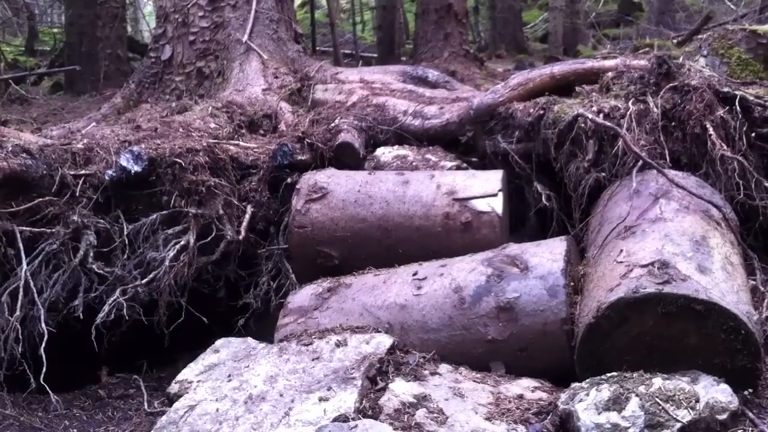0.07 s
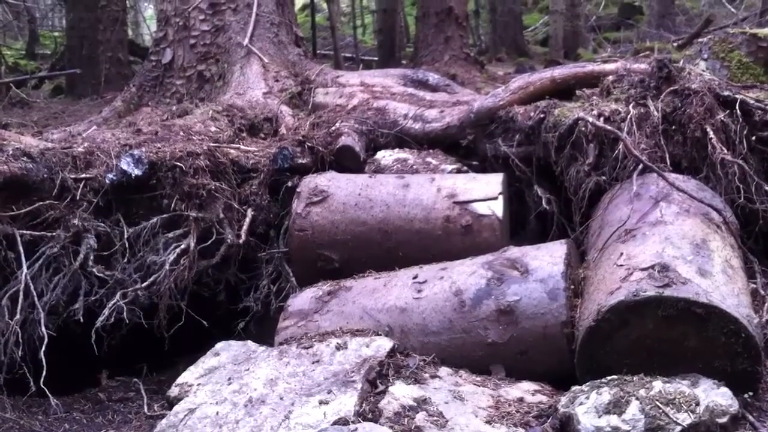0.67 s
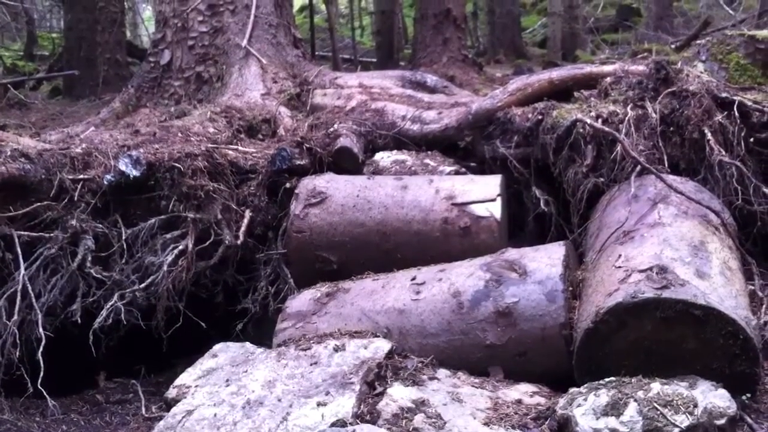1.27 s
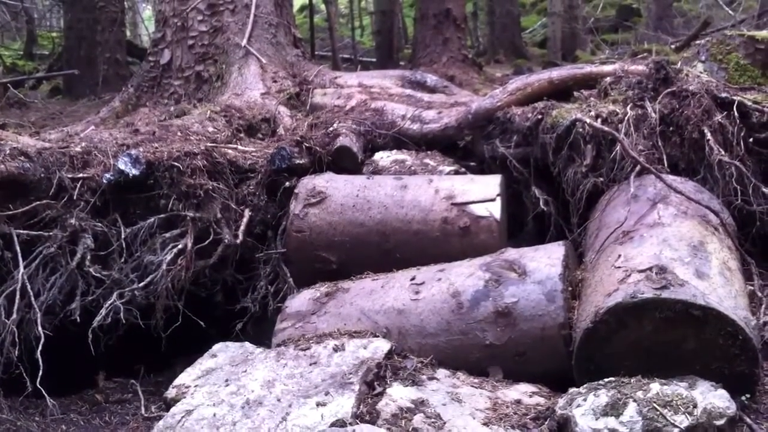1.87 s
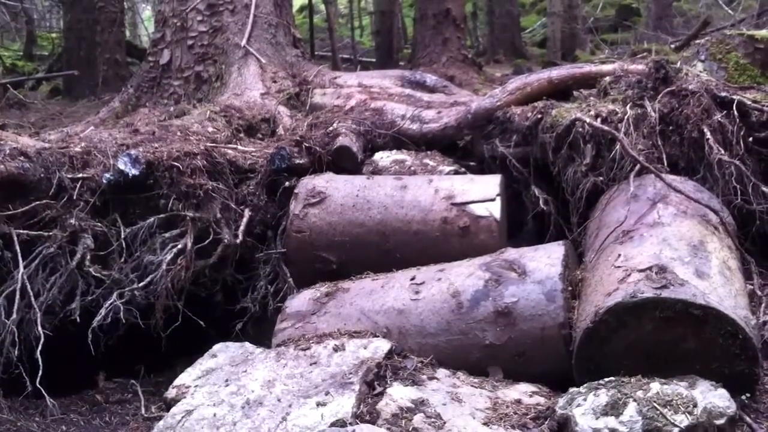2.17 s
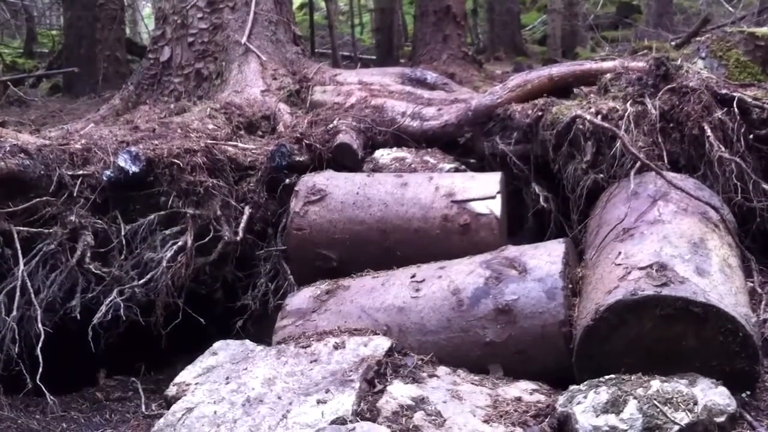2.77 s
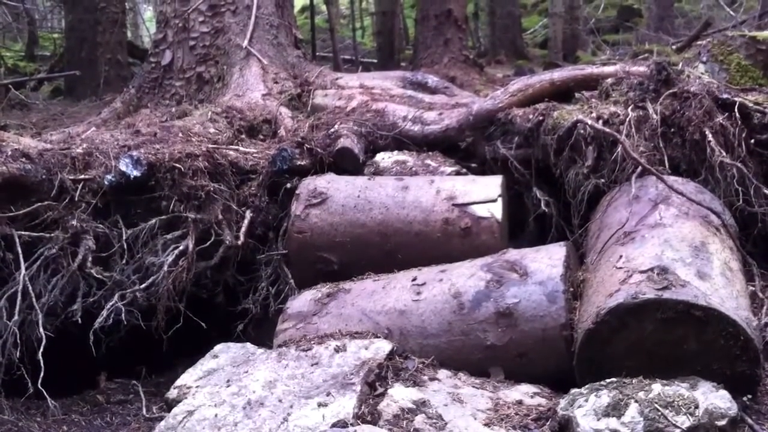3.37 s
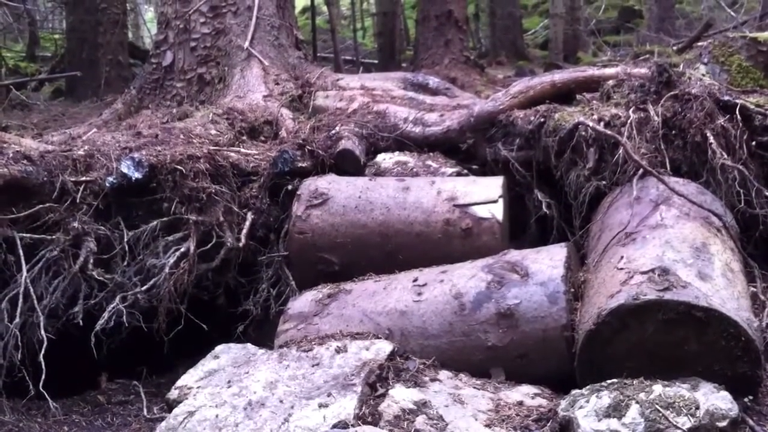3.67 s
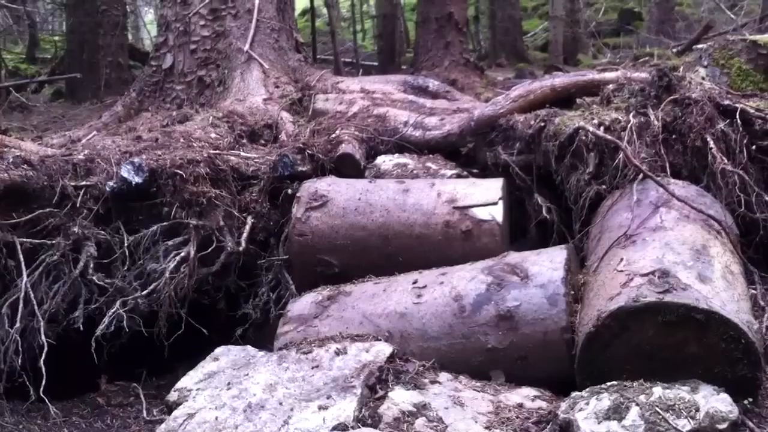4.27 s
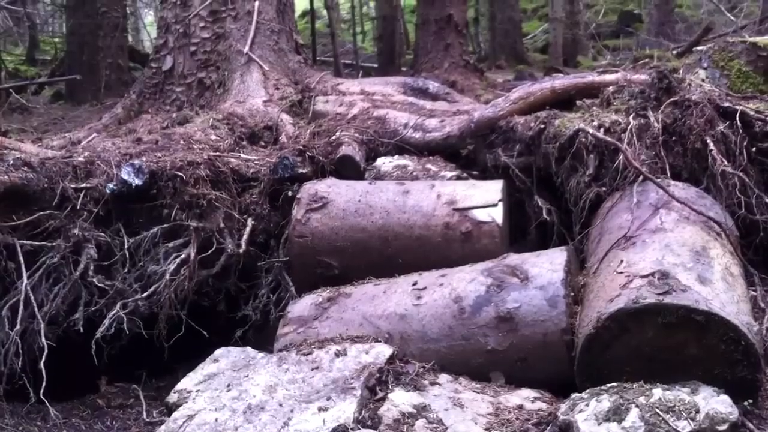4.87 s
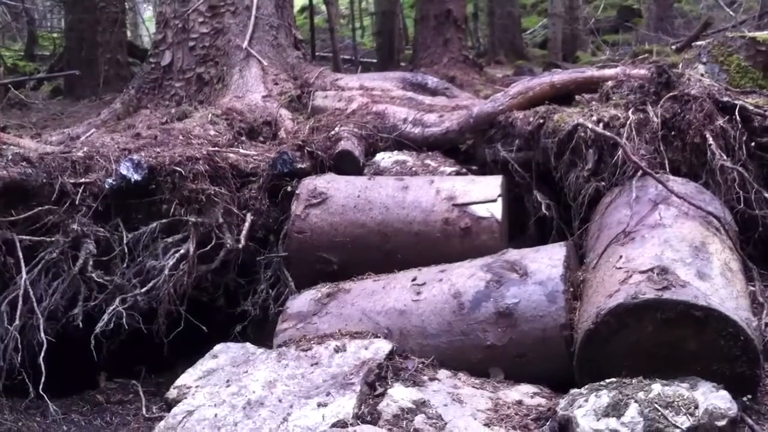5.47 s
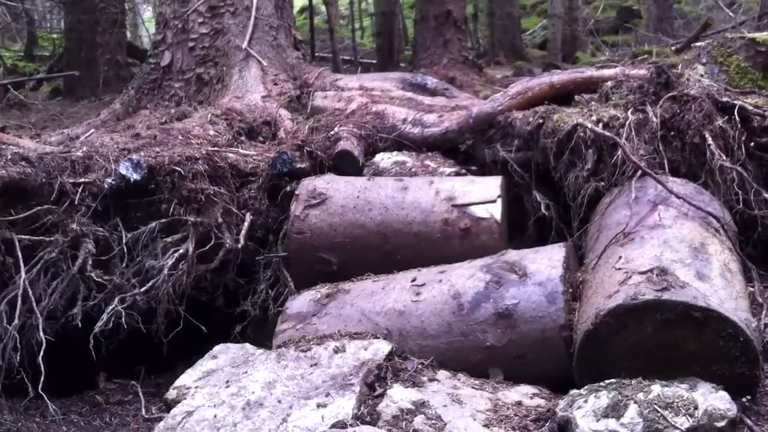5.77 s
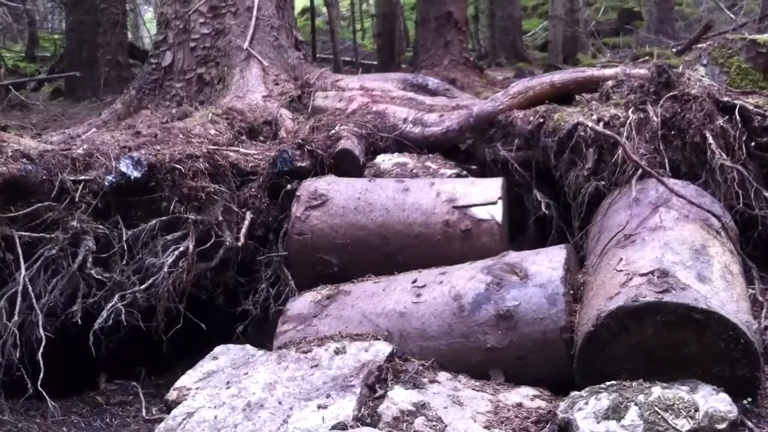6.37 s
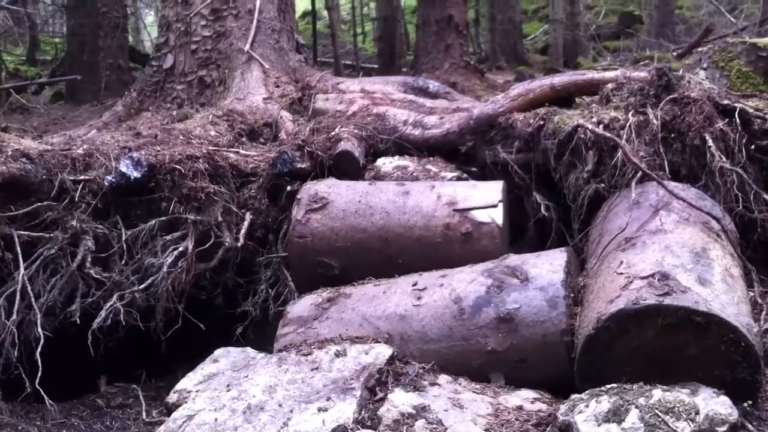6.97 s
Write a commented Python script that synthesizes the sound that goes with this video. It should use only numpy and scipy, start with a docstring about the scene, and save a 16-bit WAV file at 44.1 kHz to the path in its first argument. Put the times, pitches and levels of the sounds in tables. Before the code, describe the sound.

Soft, steady wind blows through the crowns of a conifer forest, a broad rush with a hiss of needles that slowly grows a little. A tiny songbird gives thin, very high, falling calls, mostly in pairs, with a quick run of slurred notes early on and faint chips between. About halfway, something small and dry snaps once close to the microphone. The trunks lend the calls a slight echo.

```python
"""In a conifer forest, wind slowly rises in the crowns. Boughs, twigs and needles shed eddies, the thinner
the higher in pitch: a deep roar, a broad sough, a hiss. A tiny songbird whistles thin, high, falling
calls, mostly in pairs, a run of slurs and faint flicks, which the trunks scatter. One faint note comes
from farther off, and once something small and dry snaps close by as its fibres break.
A faint steady hiss lies under it all, and both channels carry the same sound."""
import sys
import numpy as np
from scipy import signal
from scipy.fft import rfft, irfft, next_fast_len
from scipy.io import wavfile
from scipy.ndimage import uniform_filter1d, map_coordinates

SR = 44100
rng = np.random.default_rng(int(sys.argv[2]) if len(sys.argv) > 2 else 0)


def file_out(sig):
    """Save sig as 16-bit WAV at sys.argv[1]."""
    # one column per channel
    cols = np.atleast_2d(sig).T
    # limit, then scale
    lim = np.clip(cols, -1, 1)
    pcm = np.round(lim * 32767).astype(np.int16)
    wavfile.write(sys.argv[1], SR, pcm)


N = 313992

# Spectra of the five parts of the wind: frequency_hz, relative_density_db
ROAR_SPECTRUM = [(20, -22), (50, -29), (75, -20.5), (100, -14), (130, -6), (170, -2), (270, 0.3), (380, -2),
                 (550, -4), (1000, -46)]
SOUGH_SPECTRUM = [(250, -41), (400, -12.5), (520, -5.5), (650, 0), (850, 0.05), (1050, 1.4), (1400, 0.05),
                  (1650, -3.5), (1900, -9), (2600, -12.5), (4000, -24), (7000, -27.5), (11000, -34)]
NEEDLE_SPECTRUM = [(900, -25), (1600, -4.5), (2000, 0), (2750, -0.7), (3200, -5), (3900, -5.5),
                   (4700, -9.5), (5600, -15), (7000, -23.5), (8600, -25.5), (9800, -28), (11000, -35)]
TREETOP_SPECTRUM = [(800, -50), (1900, -14), (2450, -0.5), (2800, 0), (3300, -4.5), (4600, -10.5),
                    (6500, -25)]
RUSTLE_SPECTRUM = [(1000, -50), (2500, -15), (4200, -3), (6000, 1), (8000, -1.5), (10000, -4.5),
                   (11000, -10.5)]
# One slow gust lifting each part from its lull: lull_db, gain_db, middle_s, rise_s
ROAR_GUST = (-61, 3, 4, 7)
SOUGH_GUST = (-49.5, 3, 5, 4.5)
NEEDLE_GUST = (-57.5, 6, 4, 5.5)
TREETOP_GUST = (-70, 12, 2.5, 0.9)
RUSTLE_GUST = (-75.5, 8.5, 4, 1.8)
# Spectrum of the microphone's self-noise: frequency_hz, relative_density_db
HISS_SPECTRUM = [(300, -9), (3000, 0), (8000, 1.5), (11000, -6)]

# The songbird's three kinds of note; it turns, so the scattered share varies from note to note:
# start_s, length_s, pitch_hz, level_db, scatter_over_direct_db
CALL_NOTES = [ (0.017, 0.047, 8700, -56.5, -1), (0.566, 0.054, 8510, -53, 2), (0.748, 0.061, 8520, -54, 2),
              (2.768, 0.064, 8560, -55, 2), (2.937, 0.054, 8600, -55.5, 7), (4.396, 0.071, 8550, -53.5, -6),
              (4.562, 0.063, 8530, -55.7, -1), (6.122, 0.064, 8500, -58, 1), (6.284, .068, 8500, -57, 1)]
SLUR_NOTES = [(1.002, 0.077, 8330, -60, 3), (1.132, .08, 8400, -60, 5), (1.284, 0.075, 8460, -63, 4),
              (1.428, 0.087, 8450, -61.5, 4), (1.657, .07, 8450, -66, 3)]
FLICK_NOTES = [(0.19, .022, 8100, -61, 2), (0.925, .045, 8200, -68, 2), (1.865, .02, 8250, -68.5, 0),
               (2.44, .025, 8850, -68, 2), (3.468, .032, 8200, -65, 0), (5.068, .022, 8200, -60, 3),
               (5.17, .02, 9000, -65, 0), (5.425, .025, 9000, -64, 0), (6.496, .021, 9100, -62, -4),
               (6.775, .021, 8900, -61, -3), (7.068, 0.023, 8560, -57.5, -2)]
# The course of each kind of note: length_fraction, pitch_ratio, relative_level_db
CALL_CONTOUR = [(0, 0.95, -14), (.14, 1.055, -10), (.28, 1.005, -0.5), (.42, .995, -3.5), (.56, 1.025, -14),
                (.72, .975, -0.5), (.88, .958, -3), (1, 0.9, -13)]  # falls in two steps
SLUR_CONTOUR = [(0, 1.06, -8), (.14, 1.06, -3.5), (.34, .975, 3), (.48, .96, -1), (.72, 1.0, -10),
                (1, 1, -11)]  # dips and rebounds
FLICK_CONTOUR = [(0, 1.09, -2), (.4, 1.01, -0.5), (1, .88, -5)]  # one steep fall

# Fibres breaking in one dry snap: start_s, relative_level_db
FIBRE_BREAKS = [(4.0436, -35), (4.0454, -41), (4.047, -33), (4.049, -43)]
# Timbre of the snap: frequency_hz, gain_db
SNAP_RESPONSE = [(300, -9), (1000, 8), (2800, 1), (3800, -6), (4900, -6), (6200, -1), (7400, -4), (8200, 2),
                 (9000, -1), (9900, 0.5), (10600, -15), (11200, -26)]


def amp(db):
    """Amplitude grows tenfold for every 20 dB."""
    return 10 ** (np.asarray(db) / 20)


def unit(x):
    """Normalisation brings a signal to rms 1."""
    return x / np.sqrt(np.mean(x ** 2) + 1e-20)


def wobble(rate_hz):
    """Spline interpolation joins random knots, rate_hz a second, into a smooth curve."""
    knots = rng.standard_normal(int(N * rate_hz / SR) + 4)
    return map_coordinates(knots, [np.arange(N) * rate_hz / SR])


def filtered(x, response):
    """A linear filter multiplies the spectrum by its frequency response."""
    size = next_fast_len(N + SR // 2)
    return irfft(rfft(x, size) * response(np.fft.rfftfreq(size, 1 / SR)), size)[:N]


def coloured(x, points):
    """Spectral shaping: gain follows the points in log frequency, then falls 60 dB an octave."""
    points_hz, points_db = np.transpose(points)

    def response(hz):
        octaves_above = np.log2(np.maximum(hz / points_hz[-1], 1))
        return amp(np.interp(np.log(hz + 1), np.log(points_hz), points_db) - 60 * octaves_above)
    return filtered(x, response)


def add(track, start_s, sound):
    """Superposition: a sound adds to the track from start_s on."""
    part = track[max(round(start_s * SR), 0):][:len(sound)]
    part += sound[:len(part)]


def gust_db(lull_db, gain_db, middle_s, rise_s):
    """Slow amplitude modulation: a gust lifts the level along half a sine cycle."""
    progress = np.clip((np.arange(N) / SR - middle_s) / rise_s, -.5, .5)
    return lull_db + gain_db * (1 + np.sin(np.pi * progress)) / 2


def turbulence(spectrum, patchy_db):
    """Turbulent noise of rms 1: passing eddies leave patches of random gain in time and frequency."""
    cells = signal.stft(rng.standard_normal(N), nperseg=512)[2]
    patches = uniform_filter1d(rng.standard_normal(cells.shape), size=5, axis=0)
    patches = uniform_filter1d(patches, size=26, axis=1)
    noise = signal.istft(cells * amp(patchy_db * unit(patches)), nperseg=512)[1][:N]
    return unit(coloured(noise, spectrum))


def wind():
    """Vortex shedding from boughs, twigs and needles: the thinner the obstacle, the higher its band."""
    flurry = wobble(rate_hz=2.78)  # small flurries reach twigs and needles together
    roar = amp(gust_db(*ROAR_GUST)) * turbulence(ROAR_SPECTRUM, patchy_db=0.57)
    sough = amp(gust_db(*SOUGH_GUST) + 0.38 * flurry) * turbulence(SOUGH_SPECTRUM, patchy_db=0.5)
    needles = amp(gust_db(*NEEDLE_GUST) + 0.14 * flurry) * turbulence(NEEDLE_SPECTRUM, patchy_db=1.2)
    # The gust meets the highest shoots first and rustles the nearest boughs later.
    treetops = amp(gust_db(*TREETOP_GUST)) * turbulence(TREETOP_SPECTRUM, patchy_db=0.5)
    rustle_db = gust_db(*RUSTLE_GUST) + 0.8 * wobble(rate_hz=6)
    rustle = amp(rustle_db) * turbulence(RUSTLE_SPECTRUM, patchy_db=1.4)
    return roar + sough + needles + treetops + rustle


def microphone_hiss():
    """Self-noise: a microphone adds a faint steady hiss of its own."""
    return amp(-71.0) * unit(coloured(rng.standard_normal(N), HISS_SPECTRUM))


def among_trunks(sound, t60_s, scatter_db):
    """Diffuse scattering: energy divides between the direct path and a decaying tail from the trunks."""
    t = np.arange(SR // 2) / SR
    tail = rng.standard_normal(len(t)) * amp(-60 * t / t60_s)
    paths = amp(scatter_db) * tail / np.linalg.norm(tail)
    paths[0] += 1  # the direct path
    return signal.fftconvolve(sound, paths / np.linalg.norm(paths))


def songbird(notes, contour):
    """Frequency and amplitude modulation: a thin whistle follows its contour, roughened by a quaver."""
    track = np.zeros(N)
    fraction, ratio, contour_db = np.transpose(contour)
    quaver = .02 * wobble(rate_hz=600) + .008 * wobble(rate_hz=50)
    flutter_db = 2 * wobble(rate_hz=220)
    for start_s, length_s, pitch_hz, level_db, scatter_db in notes:
        progress = np.linspace(0, 1, int(length_s * SR))
        samples = np.clip(int(start_s * SR) + np.arange(len(progress)), 0, N - 1)
        glide_hz = pitch_hz * np.interp(progress, fraction, ratio) * (1 + quaver[samples])
        envelope = amp(level_db + np.interp(progress, fraction, contour_db) + flutter_db[samples])
        envelope *= signal.windows.tukey(len(progress), .15)
        whistle = envelope * np.sin(2 * np.pi * np.cumsum(glide_hz) / SR)
        add(track, start_s, among_trunks(whistle, t60_s=0.3, scatter_db=scatter_db))
    return track


def far_whistle(start_s=0.18, length_s=0.16, pitch_hz=4420, sag_hz=65, swell_db=4, level_db=-69.5):
    """A faint pure tone from deeper in the forest swells and sags; scattering gives it a tail."""
    track = np.zeros(N)
    progress = np.linspace(0, 1, int(length_s * SR))
    envelope = amp(level_db + swell_db * progress) * signal.windows.tukey(len(progress), .3)
    whistle = envelope * np.sin(2 * np.pi * np.cumsum(pitch_hz - sag_hz * progress) / SR)
    add(track, start_s, among_trunks(whistle, t60_s=.4, scatter_db=-12))
    return track


def snap(crack_t60_s=0.012):
    """Brittle fracture: a few dry fibres give way within milliseconds, each with a burst of noise."""
    track = np.zeros(N)
    t = np.arange(SR // 30) / SR
    for start_s, level_db in FIBRE_BREAKS:
        crack = amp(level_db - 60 * t / crack_t60_s) * rng.standard_normal(len(t))
        add(track, start_s, among_trunks(crack, t60_s=.2, scatter_db=-17))
    return coloured(track, SNAP_RESPONSE)


def scene():
    """Superposition: all sources sum at one point, and both channels carry that sum."""
    hiss = microphone_hiss()
    calls = songbird(CALL_NOTES, CALL_CONTOUR)
    slurs = songbird(SLUR_NOTES, SLUR_CONTOUR)
    flicks = songbird(FLICK_NOTES, FLICK_CONTOUR)
    mono = wind() + hiss + calls + slurs + flicks + far_whistle() + snap()
    return np.array([mono, mono])


def record(dry, cutoff_hz=11170, edge_hz=200):
    """Band limiting: a steep low-pass filter removes the highest treble."""
    def low_pass(hz):
        return np.clip((cutoff_hz - hz) / edge_hz + .5, 0, 1) ** 2
    return np.array([filtered(channel, low_pass) for channel in dry])


dry = scene()
out = record(dry)
file_out(out)
```